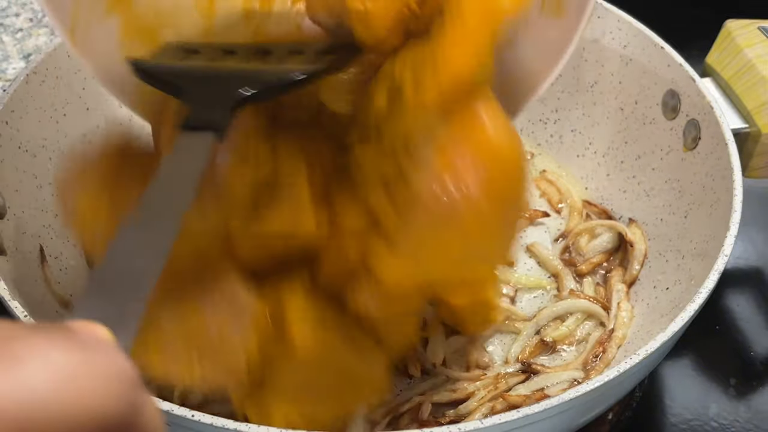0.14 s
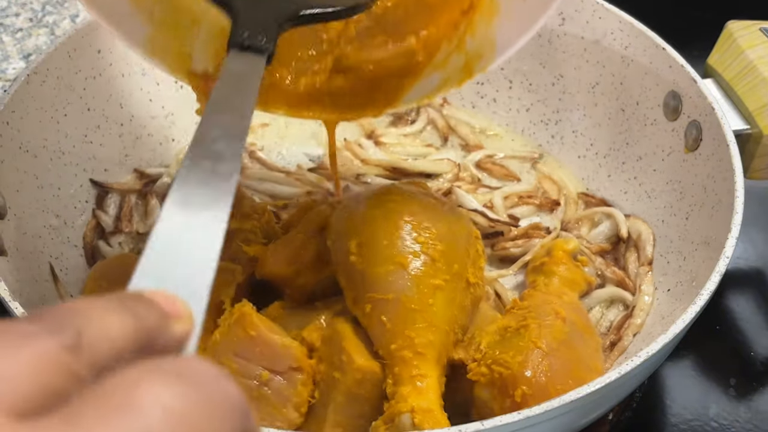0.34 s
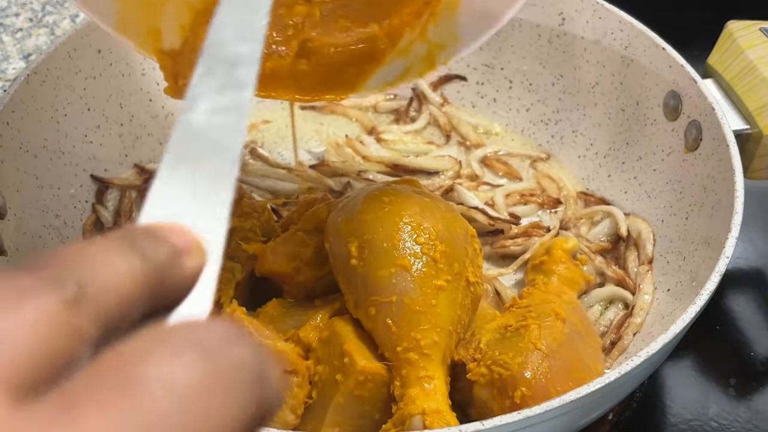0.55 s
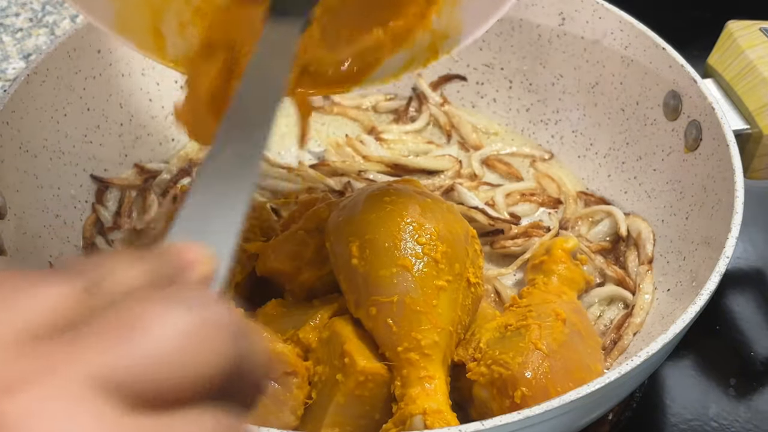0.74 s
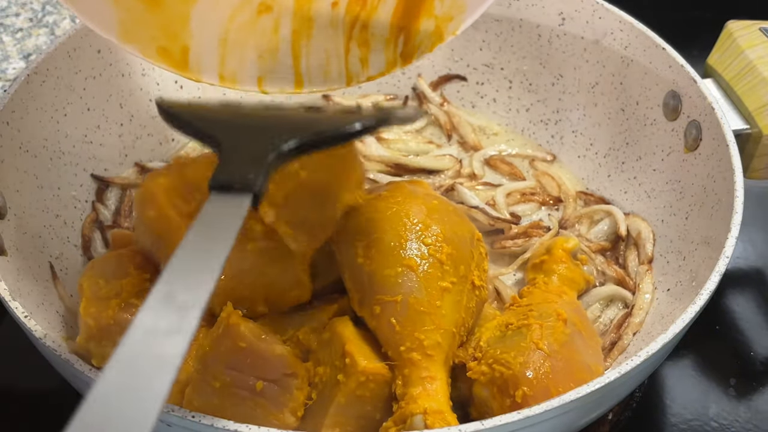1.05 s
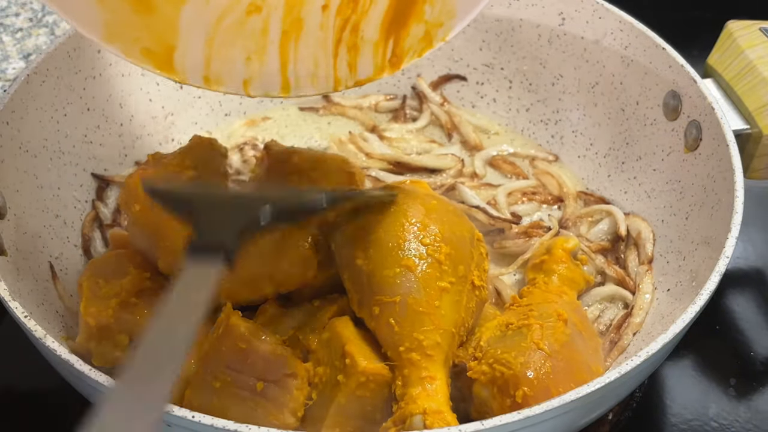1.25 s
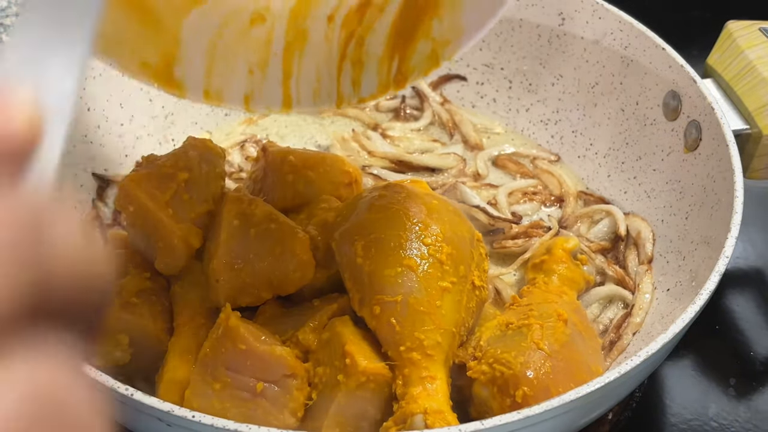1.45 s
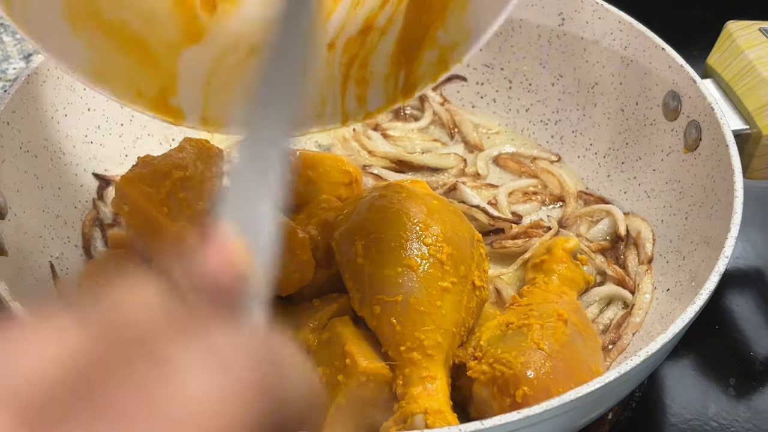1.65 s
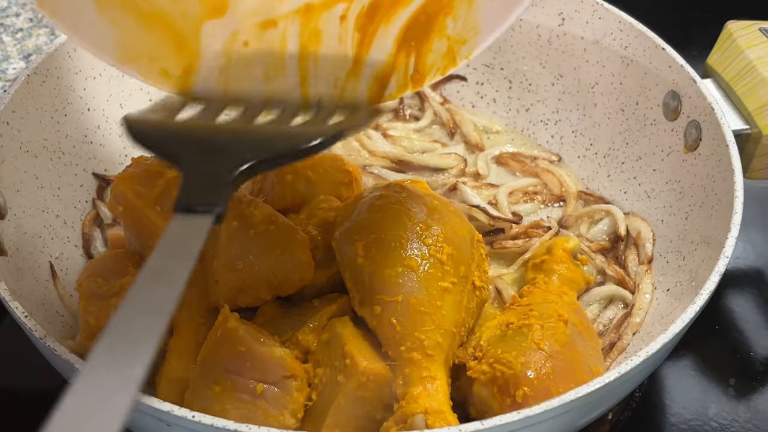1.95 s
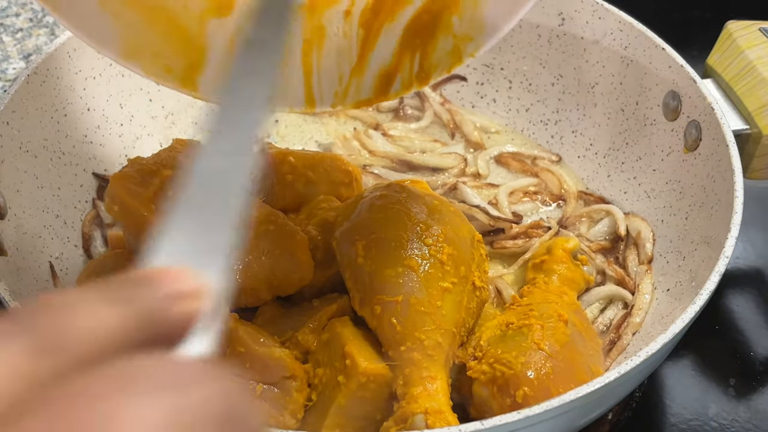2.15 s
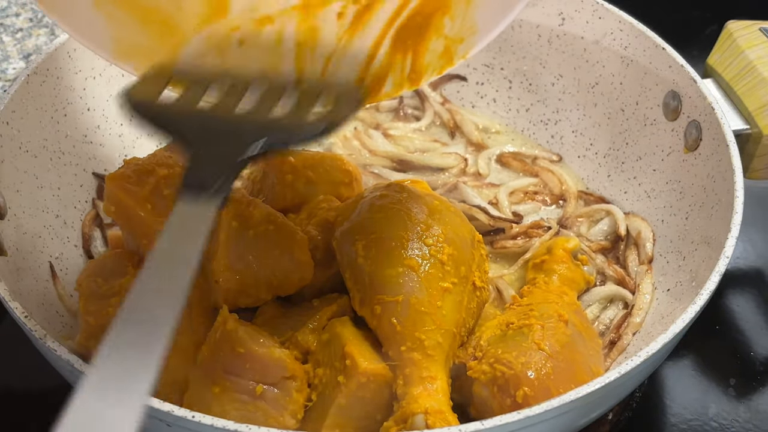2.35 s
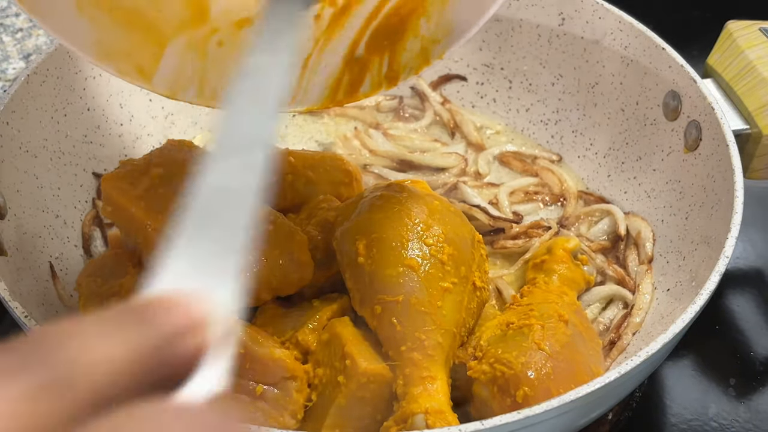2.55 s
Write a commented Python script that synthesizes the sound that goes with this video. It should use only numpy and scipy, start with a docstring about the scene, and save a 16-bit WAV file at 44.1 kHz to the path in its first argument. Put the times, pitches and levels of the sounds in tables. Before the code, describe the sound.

Frying chicken sizzles up suddenly after a faint onion crackle, spitting and sputtering for over a second; a light double knock, wet smears and faint squeaks follow as it fades, heard close in a kitchen.

```python
"""Small kitchen: marinated chicken slides from a bowl into a pan of onions in hot oil.
Pieces land as wet slaps of noise clicks with low thuds; the oil flares, spits and pops.
Frying is random clicks: band-filtered fine sizzle, lower sputter with ringing bubbles, quiet onions.
A spatula excites bowl resonances, knocks lightly and smears marinade while the frying dies down.
The pan adds narrow resonances; low rumble and hum lie beneath."""
import sys
import numpy as np
from scipy import signal
from scipy.fft import rfft, irfft, next_fast_len
from scipy.io import wavfile

SR = 44100
rng = np.random.default_rng(int(sys.argv[2]) if len(sys.argv) > 2 else 0)


def store_pcm(level_fs):
    """Save levels as 16-bit WAV."""
    pcm = np.round(np.clip(level_fs, -1, 1) * 32767).astype(np.int16)
    wavfile.write(sys.argv[1], SR, np.atleast_2d(pcm).T)


N = 119070
T = np.arange(N) / SR

# room rumble spectrum: f/Hz, level/dB
RUMBLE_SPECTRUM = [(12,-5.5),(28,2.5),(42,-6.5),(56,-24),(110,-24.5),(250,-25.5),(2000,-36.5)]
# onion frying spectrum: f/Hz, level/dB
ONION_SPECTRUM = [(250,-41),(600,-14),(1000,-6.5),(1300,-9),(1600,3),(2050,1),(2350,-1.5),(2800,-17),(5000,-20.5),(8200,-15),(10000,-14),(15000,-31.5)]
# spatula scraping in the bowl: t/s, level/dB
SCRAPE_LEVEL = [(1.1,-66),(1.35,-41),(1.55,-40),(1.78,-40),(1.9,-42),(1.98,-41.5),(2.11,-43.5),(2.2,-41.5),(2.26,-44),(2.3,-40.5),(2.36,-38),(2.41,-55),(2.5,-48),(2.56,-53.5),(2.7,-56)]
# resonances of bowl and spatula: f/Hz, width/Hz, level/dB
BOWL_MODES = [(578,42,-12.5),(1488,76,-9.5),(1780,42,0.5),(1946,42,4),(2020,36,1.5),(2200,24,-7),(3512,93,-9),(4000,190,-17),(5420,430,-14),(6530,120,-10.5),(8800,200,-22),(10530,440,-19.5)]
# spatula knocks on the bowl: t/s, level/dB
KNOCK_EVENTS = [(1.746,-40),(1.7531,-29.5)]
# modes rung by a knock: f/Hz, level/dB, t60/s
KNOCK_RING_MODES = [(138,-19,0.084),(220,-12.5,0.098),(320,-12,0.068),(501,-1.5,0.079),(637,-9,0.16)]
# wet smears: t/s, length/s, start f/Hz, end f/Hz, drift rate/(1/s), level/dB
SMEARS = [(0.276,0.11,605,585,50,-43.5),(0.356,0.036,800,853,220,-31.5),(0.738,.11,270,225,100,-56),(1.106,0.12,1444,1540,220,-36.5),(1.913,0.11,5200,6010,1197,-47),(1.9,0.24,600,597,69.8,-57),(2.039,0.064,930,1072,119.5,-52),(2.15,0.093,2970,3400,695,-52.5),(2.17,0.098,4500,4930,1090,-51),(2.25,0.12,3700,4340,596,-54),(2.313,0.17,5080,5900,1203,-51.5),(2.28,0.16,10450,11000,1300,-55),(2.47,0.08,1964,2620,298,-52)]
# gripping spatula, one bowl resonance sings: t/s, length/s, f/Hz, level/dB
SQUEAL_EVENTS = [(1.967,0.057,2200,-43),(2.163,0.069,1780,-41.5),(2.17,.07,1945,-41),(2.276,0.035,2000,-41),(2.312,0.096,1945,-36)]
# single big bubbles burst: t/s, gain/dB
POP_EVENTS = [(0.2853,-33),(.759,-23),(1.0447,-26),(1.083,-20.5),(1.149,-20),(1.32,-15),(1.745,-24),(1.837,-29.5),(2.205,-27),(2.504,-40)]
# pop spectrum: f/Hz, level/dB
POP_SPECTRUM = [(120,-53),(300,-27),(800,-15.5),(1650,4.5),(2200,-0.5),(2800,-33),(3500,-6),(6000,-9),(14000,-39)]
# chicken lands: t/s, level/dB, decay/s
SLAP_EVENTS = [(.268,-46.5,0.058),(.3,-45,0.087),(.359,-33,0.044),(.383,-27.5,0.03),(.43,-45,0.1)]
# wet slap spectrum: f/Hz, level/dB
SLAP_SPECTRUM = [(40,-24),(120,-31),(200,-13),(380,-2),(750,-1),(1200,-4),(2200,-4.5),(3500,-24),(12000,-37)]
# chicken weight settles on the pan: t/s, level/dB, decay/s
THUD_EVENTS = [(.288,-52,0.014),(.352,-42,0.046),(.38,-44,0.027),(.418,-45.5,0.034),(.5,-56,0.037)]
# thud spectrum: f/Hz, level/dB
THUD_SPECTRUM = [(15,2.5),(42,7),(80,-2.5),(120,5.5),(170,-3),(260,4),(600,-58)]
# marinade drops spit in the oil: t/s, level/dB, decay/s
SPIT_EVENTS = [(.025,-53,.01),(.075,-49.5,0.09),(.103,-44,0.009),(.213,-43,0.004),(.226,-41.5,0.022),(.465,-38,0.05),(.628,-36,.02),(.835,-35.5,.006),(2.342,-46,.022),(2.414,-45,.01)]
# spit spectrum: f/Hz, level/dB
SPIT_SPECTRUM = [(1000,-40),(3000,-32),(6500,2),(8300,4),(10000,-1),(13000,-4),(15500,-16)]
# oil flares as meat settles: t/s, level/dB, decay/s
FLARE_EVENTS = [(.284,-37.5,0.0095),(.6,-34,0.034),(.63,-29,0.02),(.742,-34.5,0.036),(.878,-30.5,0.013),(.994,-33.5,0.0098),(1.115,-33.5,0.02),(1.32,-35,0.018),(1.562,-34,0.04),(2.189,-47,0.039)]
# flare spectrum: f/Hz, level/dB
FLARE_SPECTRUM = [(120,-45),(300,-25),(600,-10),(1200,-2),(2000,3),(2900,-1),(5200,5),(6700,3),(9500,-6.5),(15000,-15)]
# sputter of boiling wet marinade: t/s, level/dB
SPUTTER_LEVEL = [(0,-65),(.12,-58),(.17,-66),(.25,-54.5),(.29,-45.5),(.45,-37.5),(.7,-40.5),(.83,-42.5),(1.0,-40.5),(1.12,-39),(1.25,-40),(1.38,-39.5),(1.58,-39.5),(1.64,-48),(1.7,-40),(1.77,-45),(1.82,-44),(1.92,-56),(2.07,-56),(2.15,-53.5),(2.7,-57)]
# sputter spectrum: f/Hz, level/dB
SPUTTER_SPECTRUM = [(120,-38),(250,-27.5),(350,-8.5),(490,-11.5),(600,3),(800,0),(950,-5),(1120,4),(1300,-5),(1540,4),(1850,2.5),(2230,4),(2700,-5.5),(6000,-25)]
# marinade boils up where meat presses on the pan: t/s, level/dB, decay/s
SURGE_EVENTS = [(.645,-37,.007),(.757,-36,.012),(.876,-34.5,0.022),(.997,-38.5,.012),(1.175,-44,0.016),(1.258,-36,0.02),(1.366,-34,0.019),(1.433,-36.5,.03)]
# ringing bubble spectrum: f/Hz, level/dB
BUBBLE_SPECTRUM = [(220,-24),(350,-12),(650,-1.5),(1100,1.5),(1700,2.5),(2500,-1)]
# fine sizzle, before SIZZLE_TRIM_DB: t/s, level/dB
SIZZLE_LEVEL = [(0.0,-53),(0.06,-62),(0.08,-55.5),(0.2,-52),(0.22,-52),(0.32,-41.5),(0.37,-33),(0.43,-34.5),(0.59,-33.5),
                (0.64,-30.5),(0.66,-33),(0.98,-35.5),(1.0,-32.5),(1.03,-35.5),(1.6,-33.5),(1.67,-37),(1.72,-35),
                (1.92,-46),(1.95,-42),(2.29,-53),(2.35,-46),(2.53,-52.5),(2.7,-50.5)]
# fine sizzle spectrum: f/Hz, level/dB
SIZZLE_SPECTRUM = [(300,-30),(1000,-15),(2200,-6.5),(3000,0),(3800,1),(5600,-1.5),(6400,2.5),(7400,-5),(8800,0.5),(9900,-11.5),(11300,-6),(13500,-14),(15500,-26)]
# pan resonances over the direct sound: f/Hz, level/dB
PAN_RESONANCES = [(360,-2.5),(581,1.5),(725,-0.5),(775,0.5),(848,0.5),(1088,-2.5),(1547,4),(1782,-23),(2212,-0.5),(2358,-29),(2865,-4),(4854,-30),(8403,-15)]

RUMBLE_DB, HUM_HZ, HUM_DB = -63, 28.2, -67
ONION_DB, SIZZLE_TRIM_DB = -53.5, -1.5
ONION_PER_S, SPUTTER_PER_S, BURST_PER_S = 1100, 2600, 4000
SLIPS_PER_S = 1000  # shared by all bowl resonances, and again for each alone
FIZZ_PER_CYCLE = 0.14  # bursts/s per Hz of pitch: small bubbles are more numerous
BUBBLES_PER_S, BUBBLE_Q, BUBBLE_DB = 800, 24, -3
FLURRIES_PER_S, FLURRY_DECAY_S, FLURRY_DB = 60, 0.008, -3
SIZE_SPREAD_DB, MAX_SPREADS = 3, 3.4  # click sizes: exponential in dB, capped
SPOT_SWING_DB, SCRAPE_SWING_DB = 3, 4  # slow wavering per frying spot, per bowl resonance
SLAP_ATTACK_S, KNOCK_ATTACK_S, POP_DECAY_S = 0.011, 0.006, 0.00094
PAN_T60_S, PAN_ECHO_DB, PAN_WIDTH_HZ = 0.011, 3.5, 10
ROOM_T60_S, ROOM_DB, BOWL_ECHO_DB = 0.23, -1.5, -11.5
CUTOFF_HZ = 15400
TINY = 1e-18  # keeps recursive filters out of denormals


def from_db(db):
    """Decibels to gain."""
    return 10 ** (np.asarray(db) / 20)


def rms_one(x):
    """Scale to unit rms."""
    return x / np.sqrt(np.mean(x ** 2) + 1e-20)


def level(rows):
    """Gain over time, interpolated in dB."""
    return from_db(np.interp(T, *np.transpose(rows)))


def colour(x, points):
    """Causal minimum-phase filter with the given spectrum, built from its cepstrum."""
    size = 2 * next_fast_len(N)
    hz, db = np.transpose(points)
    bins_hz = np.maximum(np.arange(size // 2 + 1) * SR / size, 1)
    gain = from_db(np.interp(np.log(bins_hz), np.log(hz), db))
    cepstrum = irfft(np.log(gain))
    # fold onto positive time: minimum phase
    cepstrum[1:size // 2] *= 2
    cepstrum[size // 2 + 1:] = 0
    return irfft(rfft(x, size) * np.exp(rfft(cepstrum)))[:N]


def coloured_noise(points):
    """Steady noise with the given spectrum; rms 1."""
    return rms_one(colour(rng.standard_normal(N), points))


def drift(rate_per_s):
    """Random wander through rate_per_s knots a second; rms 1."""
    knots = rng.standard_normal(8192)
    return rms_one(np.interp(T * rate_per_s, np.arange(len(knots)), knots))


def clicks(per_s, clump_db):
    """Random clicks of uneven size; a shared drift makes them clump in loudness."""
    born = rng.random(N) < per_s / SR
    size = rng.laplace(0, 1, N)[born]
    clumps = np.minimum(drift(70), 1)[born]
    size_db = SIZE_SPREAD_DB * np.minimum(abs(size), MAX_SPREADS)
    out = np.zeros(N)
    out[born] = np.sign(size) * from_db(size_db + clump_db * clumps)
    return out


def resonate(x, hz, width_hz):
    """One resonance, gain 1 at its top."""
    r = np.exp(-np.pi * width_hz / SR)
    poles = [1, -2 * r * np.cos(2 * np.pi * hz / SR), r * r]
    return (1 - r * r) / 2 * signal.lfilter([1, 0, -1], poles, x)


def reflect(x):
    """One spot's path: direct sound, brief pan echoes, diffuse kitchen tail; path energy 1."""
    age = T[:SR // 3]
    path = np.where(age == 0, 1., 0.)
    for t60_s, db in ((PAN_T60_S, PAN_ECHO_DB), (ROOM_T60_S, ROOM_DB)):
        tail = rng.standard_normal(len(age)) * from_db(-60 * age / t60_s)
        path = path + from_db(db) * tail / np.linalg.norm(tail)
    return signal.fftconvolve(x, path / np.linalg.norm(path))[:N]


def crackle(spectrum, per_s, clump_db, count):
    """Bubbles burst at many pan spots, each with its own path to the ear; rms 1."""
    spots = np.zeros(N)
    for _ in range(count):
        bursting = clicks(per_s / count, clump_db)
        spots += reflect(bursting * from_db(SPOT_SWING_DB * drift(15)))
    return rms_one(colour(spots, spectrum))


def bursts(rows, attack_s):
    """Envelope: each event swells linearly, decays exponentially; powers add."""
    power = 0
    for start_s, db, decay_s in rows:
        age = np.maximum(T - start_s, 0)
        attack = np.minimum(age / attack_s, 1)
        decay = np.exp(-np.maximum(age - attack_s, 0) / decay_s)
        power = power + (from_db(db) * attack * decay) ** 2
    return np.sqrt(power)


def rumble():
    """Steady low-weighted noise."""
    return from_db(RUMBLE_DB) * coloured_noise(RUMBLE_SPECTRUM)


def hum():
    """Steady low sine."""
    return from_db(HUM_DB) * np.sin(2 * np.pi * HUM_HZ * T)


def onions():
    """Onions fry quietly: steady sparse crackle."""
    return from_db(ONION_DB) * crackle(ONION_SPECTRUM, ONION_PER_S, clump_db=-2.0, count=7)


def scrape():
    """Small slips, partly shared, excite bowl resonances that waver separately."""
    shared = clicks(SLIPS_PER_S, clump_db=3.0)
    out = np.zeros(N)
    for k, (hz, width_hz, db) in enumerate(BOWL_MODES):
        slips = shared + clicks(SLIPS_PER_S, clump_db=3.0)
        drive = slips * from_db(db + SCRAPE_SWING_DB * drift(19))
        out += (-1) ** k * resonate(drive, hz, width_hz)  # alternating mode sign
    return level(SCRAPE_LEVEL) * rms_one(out)


def knocks():
    """A light double knock rings low modes that decay exponentially."""
    out = np.zeros(N)
    for start_s, db in KNOCK_EVENTS:
        age = np.maximum(T - start_s, 0)
        attack = np.minimum(age / KNOCK_ATTACK_S, 1)
        for hz, mode_db, t60_s in KNOCK_RING_MODES:
            decay = from_db(db + mode_db - 60 * age / t60_s)
            out += decay * np.sin(2 * np.pi * hz * age) * attack
    return out


def squelches():
    """Marinade smeared by spatula and meat: a wet resonance glides as the gap changes."""
    out = np.zeros(N)
    for start_s, length_s, from_hz, to_hz, rate_per_s, db in SMEARS:
        part = np.clip((T - start_s) / length_s, 0, 1)
        phase = 2 * np.pi * np.cumsum(from_hz + (to_hz - from_hz) * part) / SR
        # random quadrature amplitudes: narrow-band noise
        band = drift(rate_per_s) * np.cos(phase) + drift(rate_per_s) * np.sin(phase)
        out += from_db(db) * np.sin(np.pi * part) * band
    return out


def squeals(waver_hz=20, flutter_db=2.0):
    """While the spatula grips, a rough, wavering tone swells and fades."""
    out = np.zeros(N)
    for start_s, length_s, hz, db in SQUEAL_EVENTS:
        swell = np.sin(np.pi * np.clip((T - start_s) / length_s, 0, 1))
        phase = 2 * np.pi * np.cumsum(hz + waver_hz * drift(200)) / SR
        out += from_db(db + flutter_db * drift(250)) * swell * np.sin(phase)
    return out


def pops():
    """A big bubble bursts in a crack of a millisecond or two."""
    noise = coloured_noise(POP_SPECTRUM)
    out = np.zeros(N)
    for start_s, db in POP_EVENTS:
        age = np.maximum(T - start_s, 0) / POP_DECAY_S
        out += from_db(db) * age * np.exp(-age) * noise
    return out


def chicken():
    """Soft pieces land in a wet splatter; their weight thuds in the pan."""
    wet = crackle(SLAP_SPECTRUM, BURST_PER_S, clump_db=-1.3, count=4)
    splatter = bursts(SLAP_EVENTS, attack_s=SLAP_ATTACK_S) * wet
    thud = bursts(THUD_EVENTS, attack_s=0.018) * coloured_noise(THUD_SPECTRUM)
    return splatter + thud


def spits():
    """Marinade drops hit the oil: short bright crackles."""
    crackling = crackle(SPIT_SPECTRUM, BURST_PER_S, clump_db=2.0, count=4)
    return bursts(SPIT_EVENTS, attack_s=0.0012) * crackling


def flares():
    """Oil flares as meat settles: short dense crackles."""
    crackling = crackle(FLARE_SPECTRUM, BURST_PER_S, clump_db=0.0, count=4)
    return bursts(FLARE_EVENTS, attack_s=0.0036) * crackling


def bubbles(count=30):
    """Larger marinade bubbles ring briefly, on a ladder of pitches; rms 1."""
    rings = np.zeros(N)
    for hz in np.geomspace(260, 2500, count):
        bursting = clicks(BUBBLES_PER_S / count, clump_db=0.8) + TINY
        rings += resonate(bursting, hz, hz / BUBBLE_Q) / np.sqrt(hz)
    return rms_one(colour(rings, BUBBLE_SPECTRUM))


def sputter():
    """Wet marinade boils: crackle plus ringing bubbles, surging where meat presses down."""
    crackling = crackle(SPUTTER_SPECTRUM, SPUTTER_PER_S, clump_db=2.5, count=14)
    boiling = np.hypot(level(SPUTTER_LEVEL), bursts(SURGE_EVENTS, attack_s=0.0061))
    return boiling * (crackling + from_db(BUBBLE_DB) * bubbles())


def fizz(count=20):
    """Tiny bubbles: each pan spot bursts around a pitch of its own; rms 1."""
    out = np.zeros(N)
    for hz in np.geomspace(900, 15000, count):
        edges_hz = [hz / np.sqrt(2), hz * np.sqrt(2)]
        band = signal.butter(2, edges_hz, "band", fs=SR, output="sos")
        bursting = clicks(FIZZ_PER_CYCLE * hz, clump_db=1.5)
        wavering = bursting * from_db(SPOT_SWING_DB * drift(14))
        out += reflect(signal.sosfilt(band, wavering + TINY))
    return rms_one(colour(out, SIZZLE_SPECTRUM))


def flurries():
    """Sizzle gain: water meets oil, power jumps and sinks back exponentially; rms 1."""
    starts = (rng.random(N) < FLURRIES_PER_S / SR) * rng.uniform(0, 1.6, N)
    keep = np.exp(-1 / (FLURRY_DECAY_S * SR))
    power = signal.lfilter([1], [1, -keep], starts + TINY)
    return rms_one(np.sqrt(1 + from_db(FLURRY_DB) ** 2 * power))


def sizzle():
    """Fine fizz of the wet chicken in oil, gusting in flurries."""
    return from_db(SIZZLE_TRIM_DB) * level(SIZZLE_LEVEL) * flurries() * fizz()


def pan(x):
    """Narrow pan resonances added to whatever sounds in it."""
    return x + sum(from_db(db) * resonate(x, hz, PAN_WIDTH_HZ) for hz, db in PAN_RESONANCES)


def scene():
    """Pan and bowl in the kitchen, over low hum and rumble."""
    bowl = scrape() + knocks() + squelches() + squeals()
    background = rumble() + hum()
    frying = onions() + sizzle() + sputter() + spits() + flares()
    in_pan = pan(frying + chicken() + pops())
    bowl_echo = from_db(BOWL_ECHO_DB) * reflect(bowl)
    return (background + bowl + bowl_echo + in_pan)[None]


def record(dry):
    """Steep low-pass at CUTOFF_HZ."""
    low_pass = signal.ellip(10, 0.1, 80, CUTOFF_HZ, fs=SR, output="sos")
    return signal.sosfilt(low_pass, dry)


dry = scene()
out = record(dry)
store_pcm(out)
```